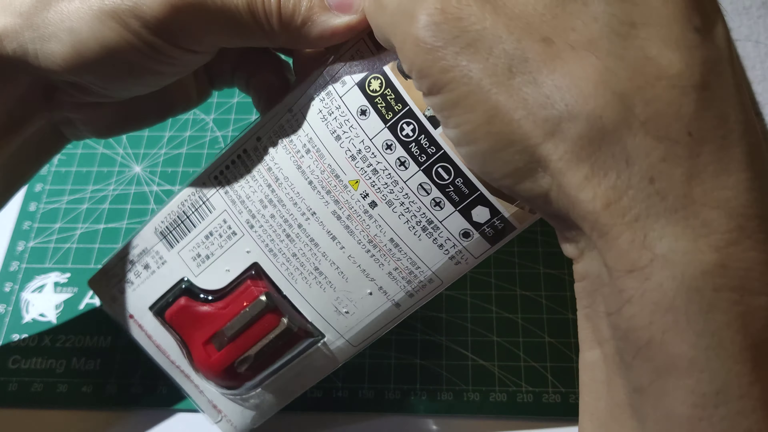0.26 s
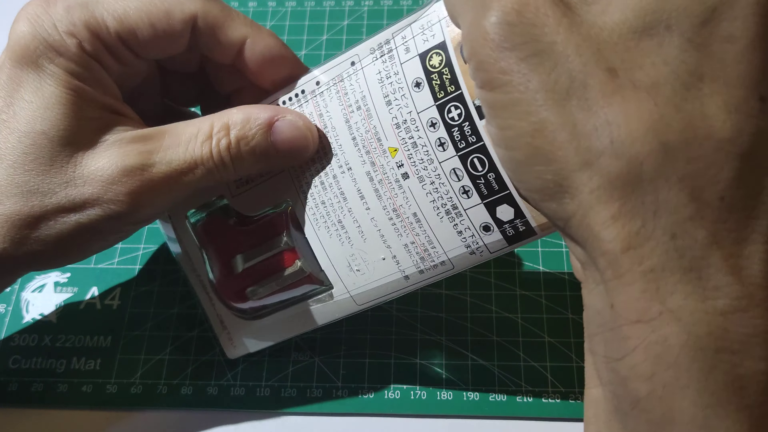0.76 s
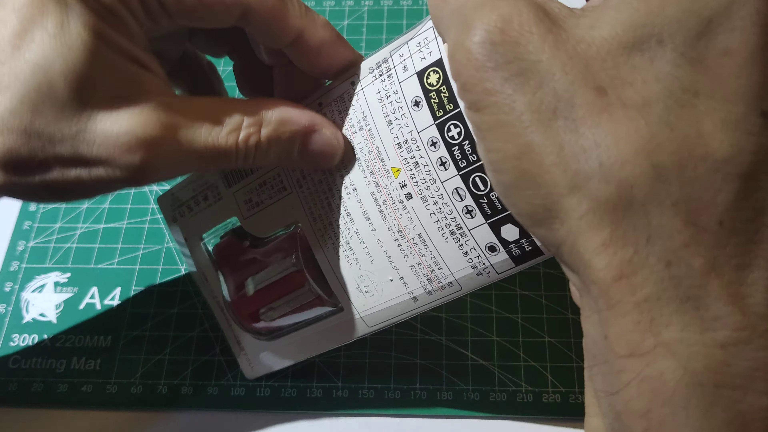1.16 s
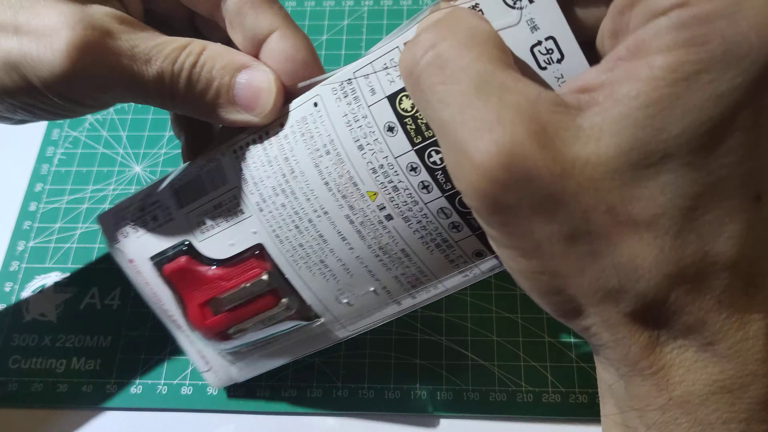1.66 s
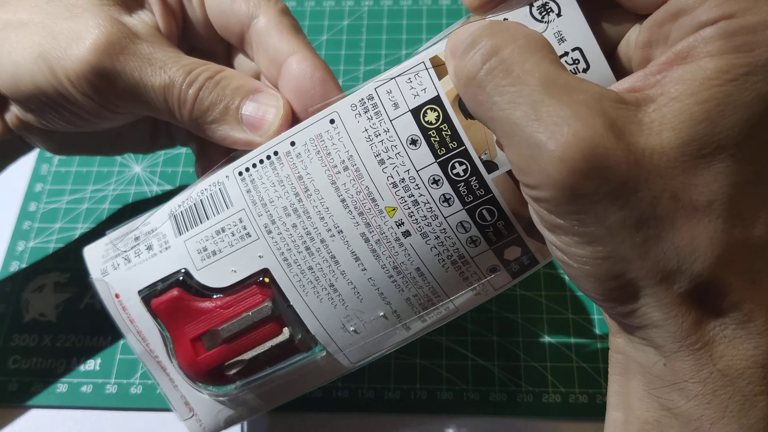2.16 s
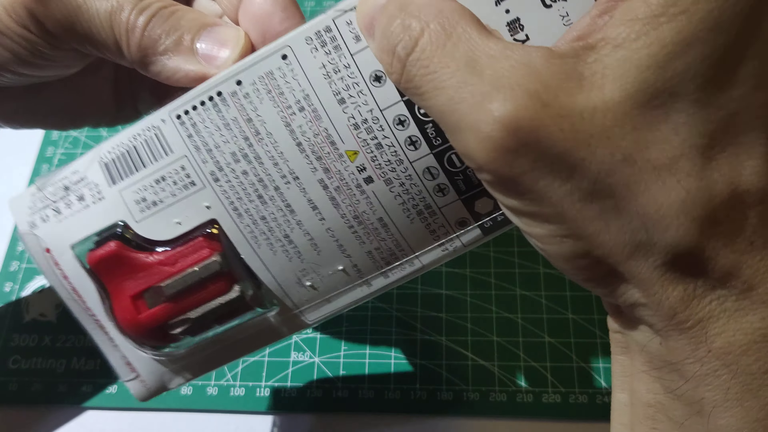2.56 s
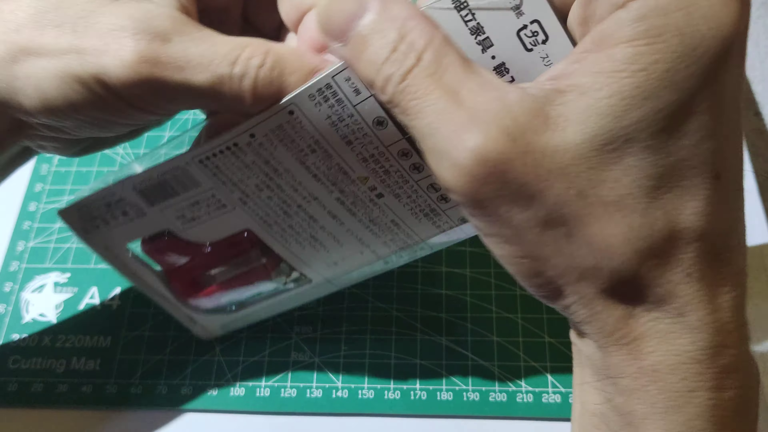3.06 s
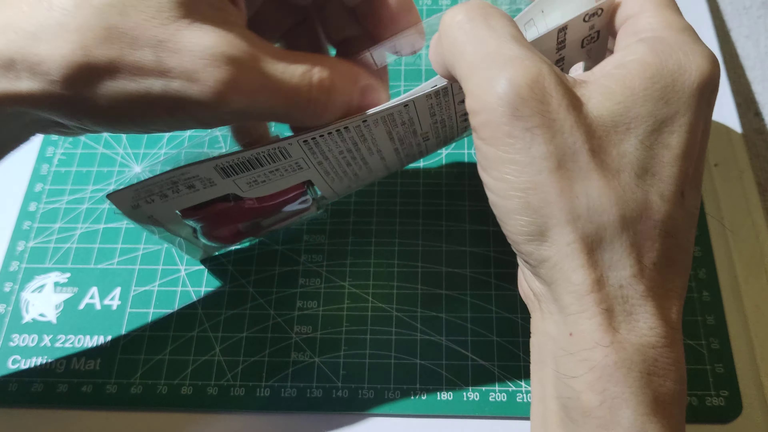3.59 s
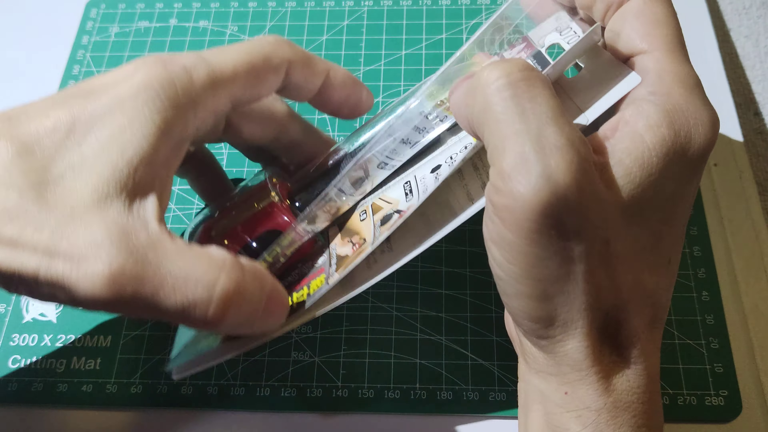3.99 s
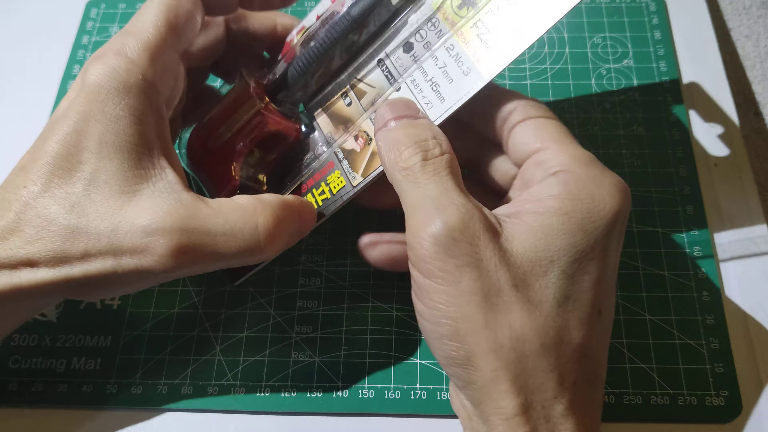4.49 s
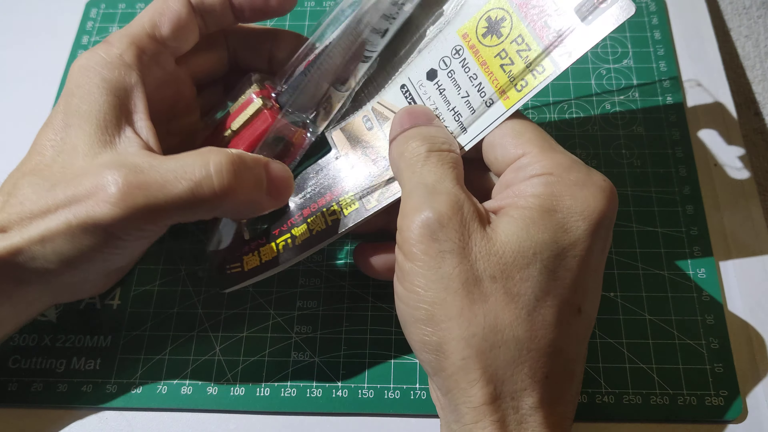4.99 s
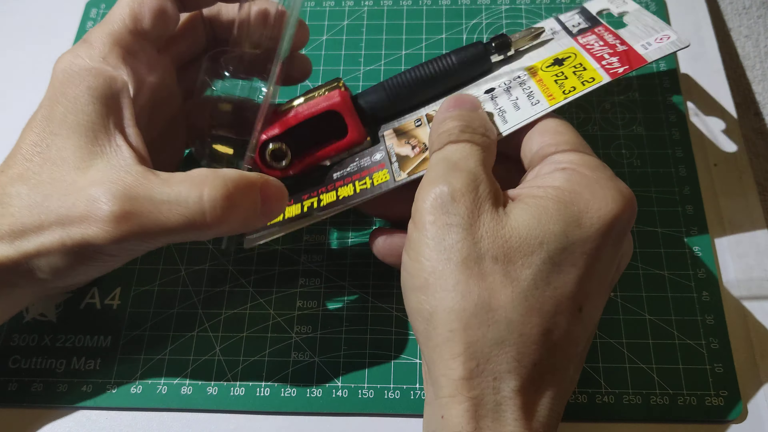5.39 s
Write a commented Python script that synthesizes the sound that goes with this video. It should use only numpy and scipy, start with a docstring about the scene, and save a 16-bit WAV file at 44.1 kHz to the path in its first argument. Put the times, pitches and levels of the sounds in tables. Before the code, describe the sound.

A stereo microphone very near the hands picks up dry finger rubs, tiny crease ticks and a slow crackling seam on card packaging. Thin plastic then buckles in crisp, hollow cracks with soft bumps beneath, peaking in a tight cluster. It calms to light scraping before a final scrape and double snap. Short room echoes and a faint wavering low drone sit underneath.

```python
"""Plastic blister peeled off its card

Two hands prise a plastic blister off its paper card, close above a table in a small quiet room.
Rubbing and tearing card is hiss and random grains; creases and creaking seams tick as tiny slips.
The thin shell snaps with a bright crack, a thud and ringing panels, all from one jolt of noise.
Bumps in the hands are short damped low tones; a wavering drone, hum lines and faint air run beneath."""
import sys
import numpy as np
from scipy import signal
from scipy.fft import rfft, irfft
from scipy.io import wavfile
from scipy.ndimage import uniform_filter1d

SR = 44100
rng = np.random.default_rng(int(sys.argv[2]) if len(sys.argv) > 2 else 0)


def inscribe(sig):
    """Save sig as 16-bit PCM at rate SR to the path in sys.argv[1].

    A 1-D sig is mono; a 2-D sig holds one channel per row.
    Samples are clipped to [-1, 1] before scaling.
    """
    pcm = np.round(np.clip(np.atleast_2d(sig).T, -1, 1) * 32767)
    wavfile.write(sys.argv[1], SR, pcm.astype(np.int16))


N = 248724
T = np.arange(N) / SR
RING, LEAD = 8192, 128  # samples: length of a short sound, and the blow's place inside it


def amp(db):
    """Turn dB into a linear gain."""
    return 10 ** (np.asarray(db) / 20)


def unit(x):
    """Scale to rms 1."""
    return x / np.sqrt(np.mean(x ** 2))


def sized(x, db):
    """Give a short sound the energy of 5 ms at this level."""
    energy = np.mean(np.sum(x ** 2, axis=-1))
    return x * amp(db) * np.sqrt(.005 * SR / energy)


def response(points):
    """Causal impulse response of a (Hz, dB) colour, from the cepstrum of its log gain."""
    hz, db = np.transpose(points)
    grid = np.fft.rfftfreq(RING, 1 / SR) + 1  # 1 Hz up, so the log is finite
    gain_db = np.interp(np.log(grid), np.log(hz), db)
    cepstrum = irfft(np.log(amp(gain_db)))
    # fold the second half onto the first: minimum phase
    cepstrum[1:RING // 2] *= 2
    cepstrum[RING // 2 + 1:] = 0
    return irfft(np.exp(rfft(cepstrum)))[:RING // 2]


def through(x, ir):
    """Pass both channels through an impulse response."""
    return signal.fftconvolve(x, np.atleast_2d(ir), axes=-1)[:, :x.shape[-1]]


def resonate(x, hz, q):
    """Two band-passes in a row: a resonance with steep skirts."""
    b, a = signal.iirpeak(hz, q, fs=SR)
    once = signal.lfilter(b, a, x)
    return signal.lfilter(b, a, once)


def pair(count, apart):
    """Noise at two ports: a shared part and a part that differs."""
    shared, own = rng.standard_normal((2, count))
    return (shared + apart * np.array([own, -own])) / np.sqrt(1 + apart ** 2)


def fade(t60):
    """Exponential decay, 60 dB down after t60 seconds."""
    return np.exp(-np.log(1000) * np.arange(RING) / SR / t60)


def walk(rate):
    """Smooth random wander with rms 1, taking about rate new values a second."""
    k = int(SR / rate)
    steps = np.repeat(rng.standard_normal(N // k + 1), k)
    return unit(uniform_filter1d(steps, k)[:N])


def add(out, s, x, pan_db=0):
    """Mix in a short sound whose blow, LEAD samples after its start, falls at time s."""
    i = max(int(s * SR) - LEAD, 0)
    panned = x * amp(np.array([[pan_db], [-pan_db]]) / 2)
    out[:, i:i + RING] += panned[:, :N - i]


def from_right(x, count):
    """A source nearer the right port reaches the left one count samples later."""
    return np.array([np.pad(x[0], (count, 0))[:N], x[1]])


# The low drone's level curve. Each row: time in seconds, level in dB.
DRONE_LEVEL = [(0.0, -62), (0.08, -57), (0.69, -50), (1.9, -57.5), (1.98, -51), (3.68, -59.5),
               (3.86, -48.5), (5.2, -59), (5.58, -49.5), (5.64, -53.5)]
# Steady hum lines. Each row: pitch in Hz, level in dB.
HUM_LINES = [(98.5, -66), (120, -76.5), (146, -71)]
# Colour of the faint air. Each row: frequency in Hz, relative gain in dB.
AIR_COLOUR = [(20, -6), (32, -1.5), (52, 5), (75, -5), (130, -5.5), (220, -11.5), (400, -23), (900, -25.5),
              (1500, -27.5), (3300, -31), (5000, -36), (8000, -34), (10000, -41.5), (15500, -39.5)]


def background(drone_hz=44, air_db=-59.5):
    """A resonant noise drone, wandering hum lines and faint air, its bass nearly the same at both ports."""
    drone = unit(resonate(rng.standard_normal(N), drone_hz, q=4.1))
    drone /= np.sqrt(uniform_filter1d(drone ** 2, SR // 4))  # level it over quarter seconds
    drone *= amp(np.interp(T, *np.transpose(DRONE_LEVEL)))
    hum = 0
    for hz, db in HUM_LINES:
        tone = np.sin(2 * np.pi * hz * T + 0.67 * walk(5.0))
        hum = hum + amp(db) * unit(tone * amp(2 * walk(5.2)))
    mid, side = through(rng.standard_normal((2, N)), response(AIR_COLOUR))
    side = signal.sosfilt(signal.butter(1, 450, "high", fs=SR, output="sos"), side)
    air = unit(mid + np.array([side, -side]))
    return drone + hum + amp(air_db) * air


# The pack bumps fingers and palm. Each row: start in seconds, level in dB, pitch in Hz, t60 in seconds.
PACK_BUMPS = [(0.176, -50, 293, 0.055), (.405, -48, 300, 0.17), (.565, -47, 260, 0.092),
              (1.675, -48.5, 226, 0.058), (2.831, -45, 194, 0.021), (3.39, -42, 175, 0.085),
              (3.521, -44.5, 208, 0.12), (3.603, -41.5, 162, 0.056), (3.765, -34, 171.2, 0.015),
              (3.821, -37.5, 152, 0.061), (3.896, -38.5, 85.6, 0.08), (3.904, -33.5, 172, 0.11),
              (4.041, -45, 222, 0.13), (4.077, -40, 365, 0.025), (4.096, -39.5, 239, 0.19),
              (4.151, -44, 217, 0.1), (5.358, -36.5, 378, 0.048), (5.496, -39.5, 335, 0.087)]


def bumps():
    """Soft contact: a slow push and a short low ring, damped by the hand."""
    out = np.zeros((2, N))
    for s, db, hz, t60 in PACK_BUMPS:
        tone = np.sin(2 * np.pi * hz * np.arange(RING) / SR)
        ring = tone * fade(t60) * (1 - fade(0.012))  # the last factor softens the onset
        scuff = resonate(pair(RING, apart=0.23) * fade(t60), hz, q=1)
        bump = sized(ring, db - 4) + sized(scuff, db - 5.5)
        add(out, s, np.roll(bump, LEAD, axis=1))
    return out


# The card's low, middle and high colours. Each row: frequency in Hz, relative gain in dB.
LOW_COLOUR = [(100, -8), (250, -6), (500, -9.5), (850, 1), (1300, -3.5), (1800, -12), (3500, -48)]
MID_COLOUR = [(900, -33.5), (1500, -7.5), (1950, 6.5), (2600, 2), (3400, 7.5), (4400, 0), (5500, -6),
              (8000, -41.5)]
HIGH_COLOUR = [(3500, -32.5), (5200, 1), (6200, 3), (8200, 0.5), (9800, -11), (15500, -12)]


def card_ranges():
    """Impulse responses of the card's three ranges, low to high."""
    return [response(colour) for colour in (LOW_COLOUR, MID_COLOUR, HIGH_COLOUR)]


# Where the card is being worked. Each row: time in seconds, left minus right in dB.
WORK_PLACE = [(0, -3.5), (2.6, -4), (2.8, -4.5), (3.2, -4), (3.6, -1.5), (5.64, -2)]


def place(s):
    """Left minus right in dB at time s, gliding from spot to spot."""
    return np.interp(s, *np.transpose(WORK_PLACE))


def grains(per_s, spread_db):
    """Randomly timed releases, many small and a few large."""
    sizes = amp(spread_db * np.minimum(rng.exponential(size=N), 3.5))
    signs = np.sign(rng.standard_normal(N))
    sides = 1 + .5 * rng.standard_normal((2, N))  # each grain differs a little between the ports
    return unit(signs * sides * sizes * (rng.random(N) < per_s / SR))


def stroke(start, length, attack_share=0.46, release_s=.015):
    """Speed of one stroke: it builds over part of its length, holds and dies away."""
    attack = np.clip((T - start) / (attack_share * length), 0, 1)
    return attack * np.exp(-np.clip((T - start - length) / release_s, 0, 20))


# The fingers never rest: faint shifting between strokes, swelling while the seam is pulled hardest.
HOLD_DB, HOLD_LOW_DB, HOLD_HIGH_DB, HOLD_GRIT_DB = -77.5, 1.5, -5.5, 5.5
PEEL_S, PEEL_WIDTH_S, PEEL_RISE_DB = 3.2, 0.64, 12
# A finger slides, or the card drags along the shell or peels. Each row: start in seconds,
# length in seconds, level in dB before the trim in rubbing(), low band in dB, high band in dB
# (both against the middle band), grit against hiss in dB.
RUB_STROKES = [(.03, 0.064, -61.5, -5, -1, 0), (0.159, 0.046, -61.5, 1.5, -0.5, -3.5),
               (0.482, 0.062, -59, -1.5, -2, -9.5), (0.529, 0.049, -56, -1.5, -11, 2.5),
               (0.688, 0.085, -80.5, -9.5, 16.5, -1), (0.864, 0.053, -60.5, 0, 1, -4.5),
               (1.224, 0.043, -62.5, -7, -2, 1), (1.38, .16, -68.5, 4.5, -6, -4),
               (1.761, 0.042, -67.5, 2, -14, -2), (1.821, 0.014, -55, -1.5, -2, -5),
               (2.04, 0.091, -63.5, 3, -2.5, 12), (2.37, .12, -63.5, 0.5, -0.5, 3),
               (2.662, 0.062, -56.5, -0.5, -10, 0), (2.749, 0.1, -43, -6.5, -5.5, 8),
               (3.202, 0.043, -53.5, -5.5, -6, -2), (3.268, 0.015, -56.5, 4, -0.5, 1.5),
               (3.366, 0.041, -53.5, -4, -4.5, 10), (3.523, 0.033, -48, -2.5, -5, 4),
               (3.687, 0.058, -53, -1.5, 1.5, 1.5), (3.808, 0.032, -53, 2.5, -12, 4),
               (4.106, 0.058, -53, 4, -7, 1.5), (4.208, 0.099, -45.5, -14.5, -10.5, -2),
               (4.56, 0.016, -55, -10, -4, 5), (4.688, 0.027, -65, -0.5, -1.5, -1),
               (4.832, .13, -59, -9.5, -6.5, -7), (4.998, 0.038, -50, -4.5, -14, 1),
               (5.051, 0.091, -52.5, -6.5, -6, -1), (5.26, 0.13, -42, -8.5, -2.5, -1.5),
               (5.365, 0.032, -37.5, -12.5, -8.5, 2), (5.412, 0.061, -55.5, -8, -3, 6)]


def rubbing(card, catch_db=3.5, trim_db=-1.5):
    """Fibres catch and let go: fine grains and sparser crackles over the hiss of skin on card."""
    grit = unit(grains(per_s=1300, spread_db=3.6) + .8 * grains(per_s=150, spread_db=2.5))
    hiss = pair(N, apart=0.35)
    catch = amp(catch_db * walk(90))
    holding = amp(HOLD_DB + PEEL_RISE_DB * np.exp(-((T - PEEL_S) / PEEL_WIDTH_S) ** 2))
    moves = [(holding, HOLD_LOW_DB, HOLD_HIGH_DB, HOLD_GRIT_DB)]
    for start, length, db, *colour in RUB_STROKES:
        moves.append((amp(db) * stroke(start, length), *colour))
    speed, low_db, high_db, grit_db = (np.array(column) for column in zip(*moves))
    power = speed ** 2
    gritty = amp(grit_db) ** 2 / (1 + amp(grit_db) ** 2)  # grit's share of the power
    out = 0
    for drag, share in ((grit, gritty), (hiss, 1 - gritty)):
        for ir, db in zip(card, (low_db, 0, high_db)):
            level = np.sqrt((share * amp(db) ** 2) @ power)  # sum the powers of all moves
            out = out + unit(through(drag * catch, ir)) * level
    place_db = place(T)
    return out * amp(np.array([place_db, -place_db]) / 2 + trim_db)


def slip(length, jolt, apart, build=.0003, travel=.0008):
    """A fold gives way: a brief build-up, one jolt, then a quickly dying flurry of micro-slips."""
    t = (np.arange(RING) - LEAD) / SR
    swell = np.exp(np.minimum(t / build, -np.log(1000) * t / (2 * length)))
    push = unit(pair(RING, apart) * swell) / np.sqrt(RING)
    push[:, LEAD] += jolt
    # bending waves in a thin sheet: the treble runs ahead, the delay falls as 1 / sqrt(frequency)
    hz = np.fft.rfftfreq(RING, 1 / SR)
    phase = 4 * np.pi * travel * (np.sqrt(1000 * hz) - hz / 4)
    return irfft(rfft(push) * np.exp(-1j * phase))


# The strained seam crackles slowly or creaks in quick stick-slip runs. Each row: start in seconds,
# end in seconds, typical slips per second, typical level in dB, low band in dB, high band in dB.
SEAM_CREAKS = [(0.931, 1.06, 71, -69, 7.5, -16.5), (1.839, 2.4, 35.2, -63, 3.5, -7),
               (2.761, 2.83, 120, -48, -2, -7), (2.903, 2.97, 48, -61, 3, -6),
               (3.795, 3.845, 110, -56, -2, -9.5), (4.247, 4.326, 150, -59, -10.5, -16),
               (5.012, 5.16, 95, -61.5, -2, -7)]


def creak_slips(gap_spread=0.33, spread_db=2.5):
    """Unevenly spaced, unevenly strong slips along each run, as rows like those of CREASE_TICKS."""
    rows = []
    for start, end, per_s, db, low_db, high_db in SEAM_CREAKS:
        gap, size = rng.standard_normal((40, 2)).T
        times = start + np.cumsum(np.exp(gap_spread * gap)) / per_s
        for s, k in zip(times, size):
            if s < end:
                rows.append((s, db + spread_db * k, low_db, high_db))
    return rows


# A crease flicks over or a spot of glue parts. Each row: start in seconds, level in dB,
# low band in dB, high band in dB (both against the middle band).
CREASE_TICKS = [(.005, -49.5, 0.5, -1), (.0265, -54.5, -1.5, 2), (.1611, -59.5, 2, 4), (.2246, -59.5, 1, 7),
                (.2639, -54.5, -2, -4.5), (.324, -55, 2, -18), (.3335, -39, -11, 5.5), (.638, -69, 9.5, -8),
                (.803, -73.5, 18, -9), (1.0689, -59.5, -0.5, -20), (1.1032, -65, 11.5, -15),
                (1.2733, -61, 5.5, -18), (1.4345, -63.5, 6.5, -20), (1.904, -52, -7, -1),
                (1.966, -56.5, -0.5, -6), (2.0416, -55, -3, -3.5), (2.161, -54.5, -2, -2.5),
                (2.239, -51.5, -5.5, -5.5), (2.2482, -62, -5.5, -3.5), (2.3053, -57.5, 2.5, -2.5),
                (2.5515, -50.5, 4, -7.5), (2.5946, -59, 6.5, -11), (2.6386, -51, 2, -0.5),
                (2.6518, -56, 5.5, -2.5), (2.7791, -41, -9, -3), (2.7875, -42, -2.5, -9),
                (2.8057, -43, -8, -5), (2.9848, -53, 5, -14), (3.1423, -45, -2, -15),
                (3.1775, -37, -8.5, -10), (3.468, -48.5, -11, -5), (3.5305, -41, -7, -7),
                (3.5439, -43.5, -24, -2), (3.5696, -41, -6.5, -6), (3.688, -43.5, -8.5, -11),
                (3.7158, -46.5, -18, -11.5), (3.7673, -48, 6.5, -8), (3.8783, -37.5, -1.5, -1),
                (3.96, -37, -14, -6), (3.9943, -38.5, -12, -7), (4.0095, -49, 0, -5.5),
                (4.033, -36.5, -10, -7), (4.0461, -37.5, -5, 0), (4.1493, -37, -20, -4),
                (4.1613, -43.5, -7, -3), (4.2099, -48, -6, -19), (4.4541, -61.5, -18, -2),
                (4.5656, -57, -7.5, -11), (4.6331, -52.5, 1, -5.5), (5.1735, -57.5, 1.5, -3),
                (5.4116, -43.5, 4, 2)]


def ticks(card):
    """Small creases and seam slips, each at its own spot, sound the card's three ranges."""
    out = np.zeros((2, N))
    low, mid, high = card
    for s, db, low_db, high_db in list(CREASE_TICKS) + creak_slips():
        push = slip(length=.007, jolt=0.55, apart=.45, build=.0006, travel=.0012)
        left = np.roll(push[0], rng.integers(-3, 9))  # samples: its spot between the ports
        push = np.array([left, push[1]])
        x = sized(through(push, low), low_db)
        x = x + sized(through(push, mid), 0)
        x = x + sized(through(push, high), high_db)
        add(out, s, x * amp(db), place(s))
    return out


def settle(per_s=160, t60=0.13):
    """After a snap the sheet relaxes in a few dwindling crinkles."""
    clicks = pair(RING, apart=0.43) * (rng.random(RING) < per_s / SR) * fade(t60)
    return np.roll(clicks, LEAD, axis=1)


# Colours of the shell's crack and thud. Each row: frequency in Hz, relative gain in dB.
CRACK_COLOUR = [(300, -19.5), (1000, -7.5), (2500, 4.5), (5000, 9), (8500, 4), (10200, 0.5), (15500, -3.5)]
THUD_COLOUR = [(80, -26.5), (160, -17.5), (380, -5), (650, 2.5), (1200, -6), (3000, -94)]
# The shell buckles or breaks free. Each row: start in seconds, level in dB, slip length in seconds,
# thud in dB, crack in dB, three panel resonances as Hz and dB, left minus right in dB.
# Thud, crack and panels are set against the level.
SHELL_SNAPS = [ (.3490, -16.5, 0.0021, -26, -19.5, 1250, -15, 3170, -8, 7800, 0, 2.5),
               (2.8315, -27, 0.0044, -10.5, -10.5, 931, -2, 1600, -10, 3520, -15.5, -10),
               (3.0047, -41.5, 0.0072, -25, 1.5, 4150, -19, 5230, 2.5, 7900, -5, -1),
               (3.0693, -23, 0.0065, -40, -12, 2100, -34, 3980, -12, 4970, -10, -20.5),
               (3.0747, -25.5, 0.0036, -33, 2.5, 2140, -15, 4120, -22, 5800, -19, 3.5),
               (3.0768, -19.5, 0.0025, -28, -6, 956, -20, 4350, -9.5, 6900, -10, -6.5),
               (3.5992, -18, 0.0089, -22.5, -9, 1150, -12, 1580, -8, 3600, -4, -3.5),
               (3.8804, -36.5, 0.012, -12.5, -1, 900, -9, 2400, -2.5, 3770, -5, -2.5),
               (3.8930, -16.5, 0.014, -27, -8.5, 880, -12, 2250, -6, 3400, -7, -1.5),
               (3.897, -21.5, 0.0061, -29.5, -19, 742, -8, 2000, -1, 2550, -3, -6.5),
               (3.9107, -27.5, 0.0079, -26, 3, 2302, -6.5, 3606, -5.5, 7230, -9, -1.5),
               (4.0727, -12, 0.0085, -19, -7.5, 1936, -6.5, 3170, -6.5, 5546, -5, 0),
               (4.076, -14.5, 0.0045, -22, -18.5, 920, -12, 1997, 3.5, 3127, -2, -4.5),
               (5.3558, -21, 0.014, -13, -1, 1060, -3.5, 2150, -2, 3280, -4, -2),
               (5.3601, -25, 0.03, -32, -29, 915, -1.5, 1580, 1.5, 2620, 0, -1),
               (5.4914, -22, 0.0071, -21, 1.5, 1880, -24, 2950, -6, 5900, -45, 1.5),
               (5.4949, -27, 0.035, -12.5, -8, 588, -5.5, 1090, -3.5, 1800, 1.5, -1.5)]


def snaps():
    """Each buckle gives a bright crack and a thud of the whole shell, and rings the panels next to it."""
    shell, rings = np.zeros((2, 2, N))
    crack, thud = response(CRACK_COLOUR), response(THUD_COLOUR)
    crinkle = response(MID_COLOUR) + 3.7 * crack
    for s, db, length, thud_db, crack_db, *panels, pan_db in SHELL_SNAPS:
        push = slip(length, jolt=.35, apart=.6, build=.09 * length, travel=.0007)
        blow = sized(through(push, crack), db + crack_db) + sized(through(push, thud), db + thud_db)
        add(shell, s, blow, pan_db)
        add(shell, s, sized(through(settle(), crinkle), db - 20), pan_db)
        for hz, panel_db in zip(panels[::2], panels[1::2]):
            ring = resonate(push, hz, q=2.5 + hz / 2200)
            add(rings, s, sized(ring, db + panel_db), pan_db)
    return shell, rings


# Colour of the echoes. Each row: frequency in Hz, gain in dB.
ECHO_COLOUR = [(100, 2), (300, 11), (900, 3.5), (3500, 3.5), (8000, -0.5), (15000, -2)]


def room(near_db=-11, near_t60=0.074, far_db=-16.5, far_t60=0.16):
    """Table and hands throw back a quick cluster of echoes; the walls add a short tail."""
    near = pair(RING, apart=.7) * fade(near_t60) * (1 - fade(.01))
    far = pair(RING, apart=0.7) * fade(far_t60) * (1 - fade(0.02))
    echoes = (amp(near_db) * unit(near) + amp(far_db) * unit(far)) / np.sqrt(RING)
    return through(echoes, response(ECHO_COLOUR))


def scene():
    """Snaps, ticks, rubbing and bumps close to the microphone, with echoes on all but the bumps, over the hum."""
    card = card_ranges()
    bed = background() + from_right(bumps(), count=6)
    handling = from_right(rubbing(card), count=4) + ticks(card)
    shell, rings = snaps()
    # the whole shell radiates all round, the small panels mostly towards the microphone
    echoes = through(handling + shell + amp(-3.0) * rings, room())
    return handling + from_right(shell + rings, count=1) + echoes + bed


def record(dry, ceiling=.9, top_hz=15900):
    """Soft saturation rounds the highest peaks, then a steep low-pass cuts the top."""
    rounded = ceiling * np.tanh(dry / ceiling)
    return signal.sosfilt(signal.ellip(10, .2, 70, top_hz, fs=SR, output="sos"), rounded)


dry = scene()
out = record(dry)
inscribe(out)
```